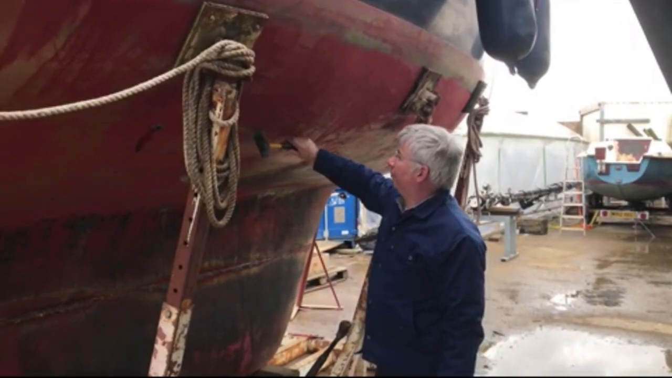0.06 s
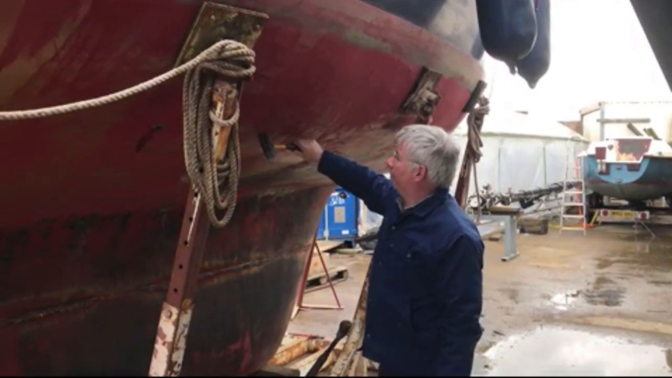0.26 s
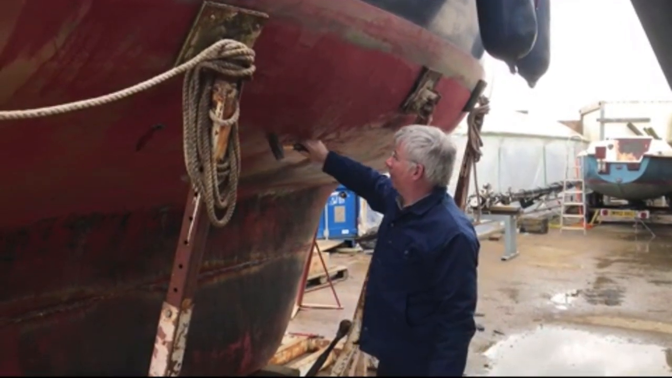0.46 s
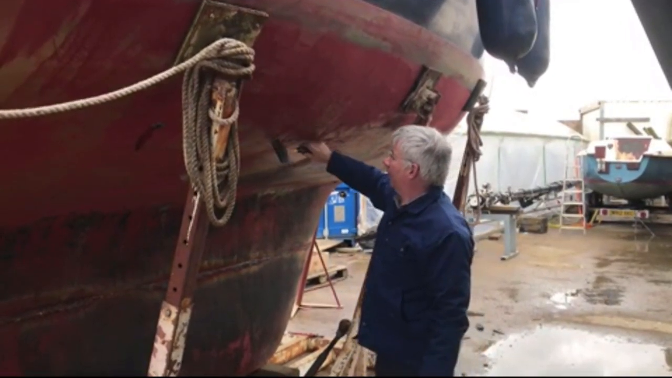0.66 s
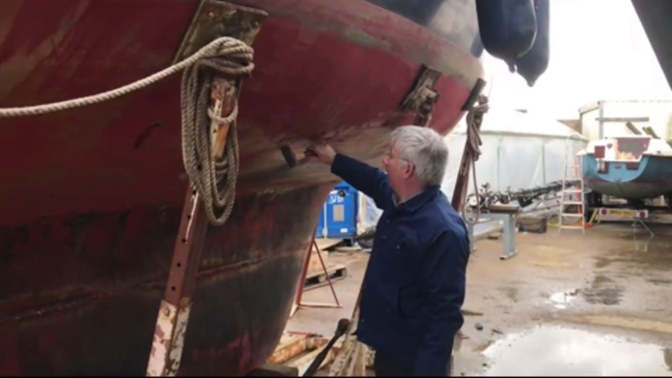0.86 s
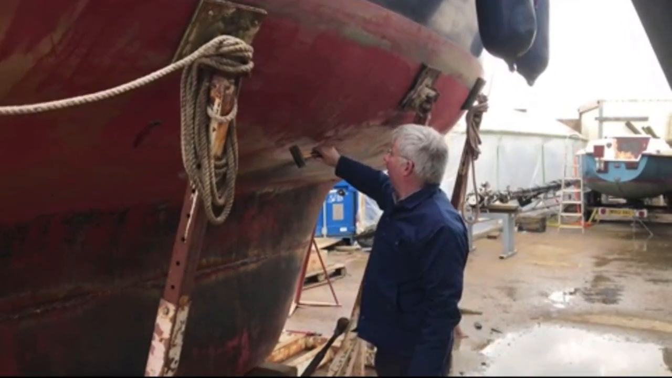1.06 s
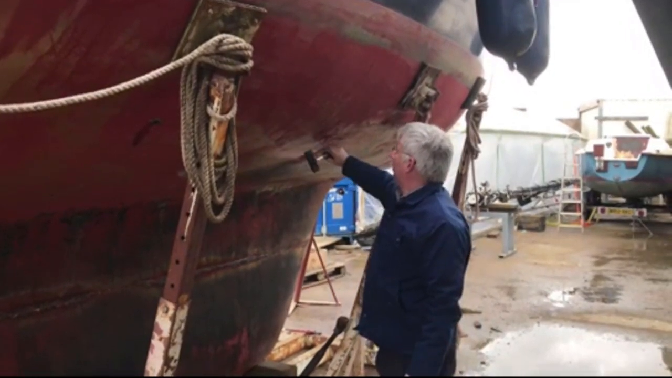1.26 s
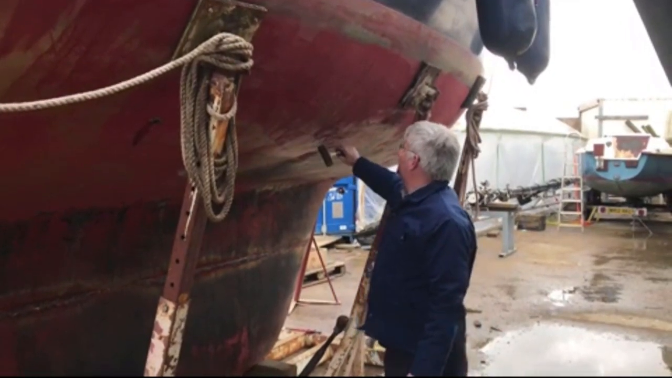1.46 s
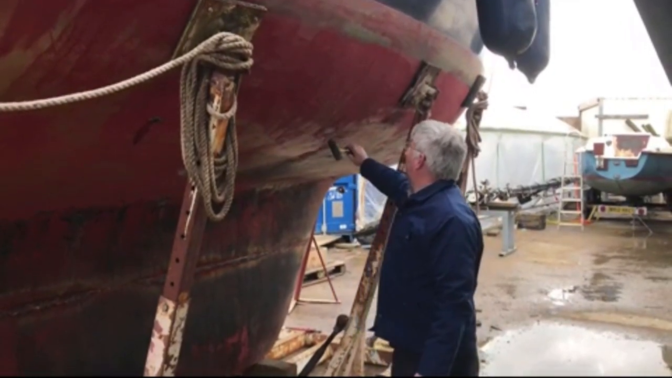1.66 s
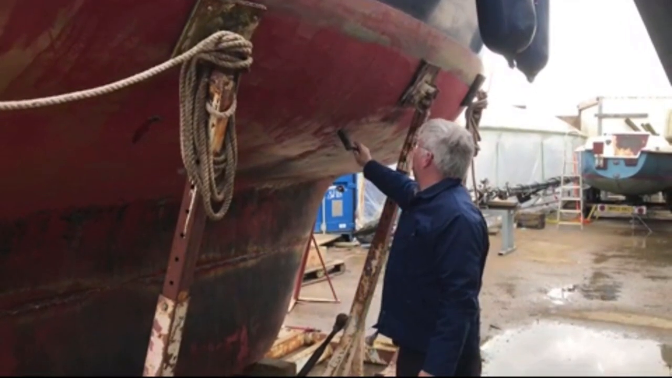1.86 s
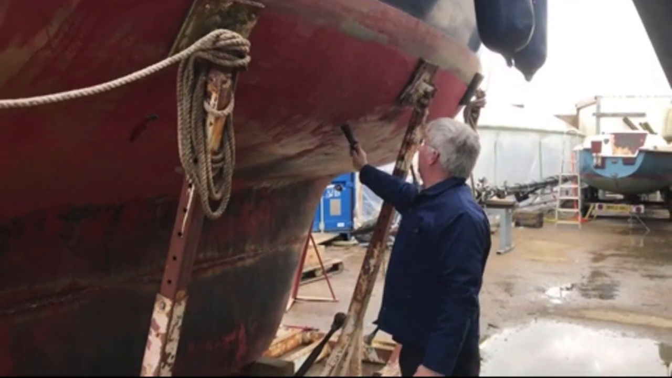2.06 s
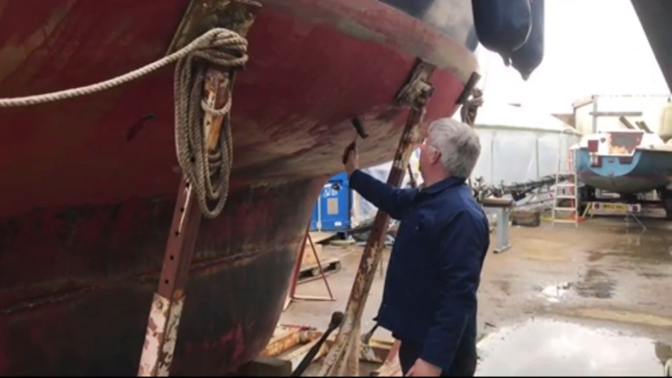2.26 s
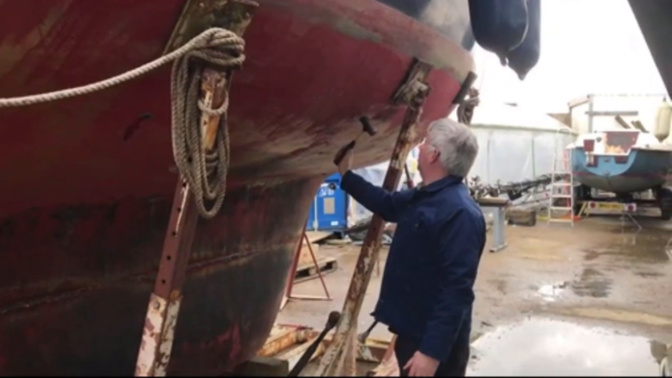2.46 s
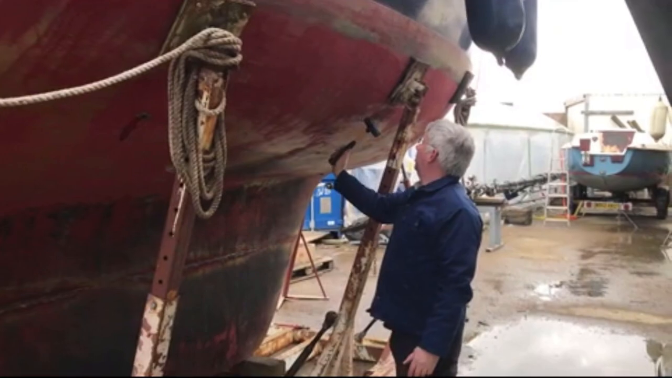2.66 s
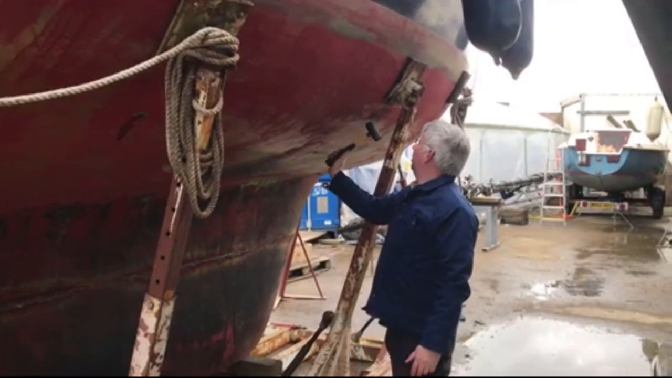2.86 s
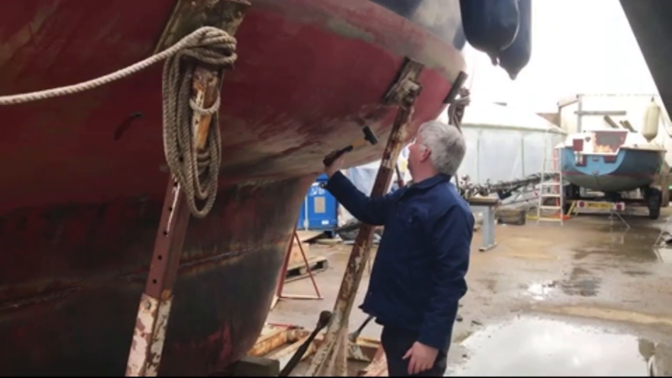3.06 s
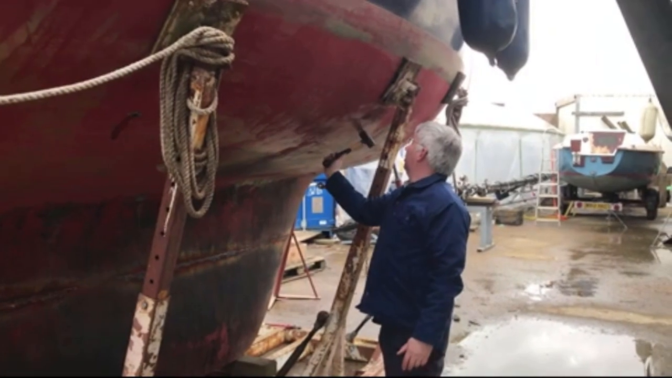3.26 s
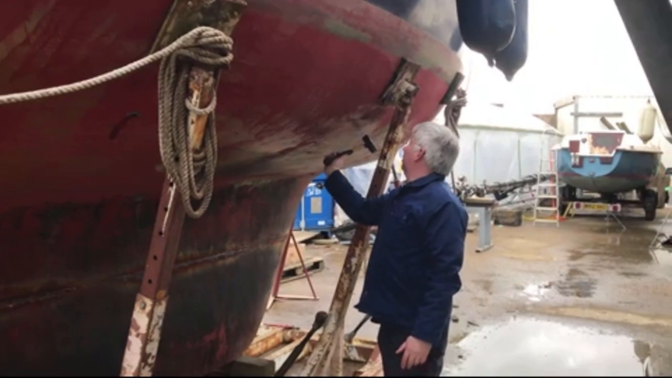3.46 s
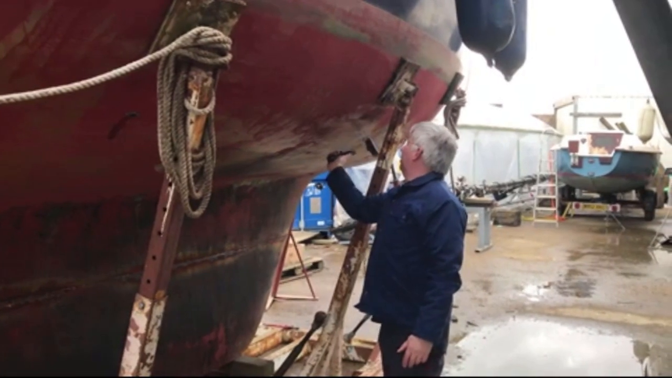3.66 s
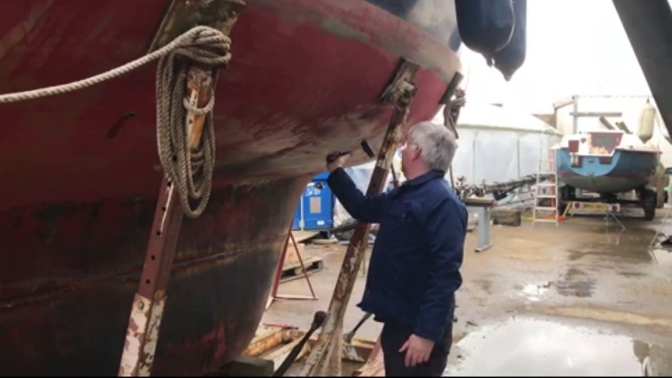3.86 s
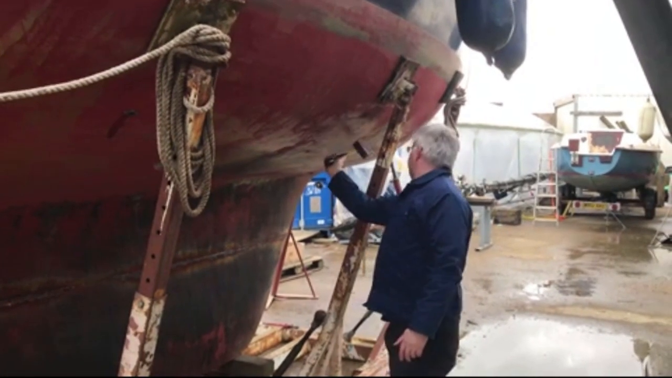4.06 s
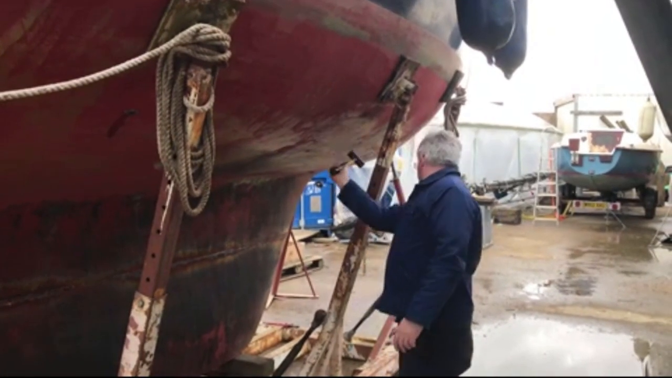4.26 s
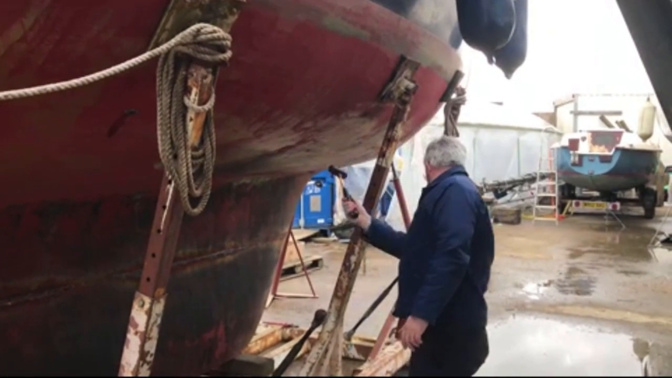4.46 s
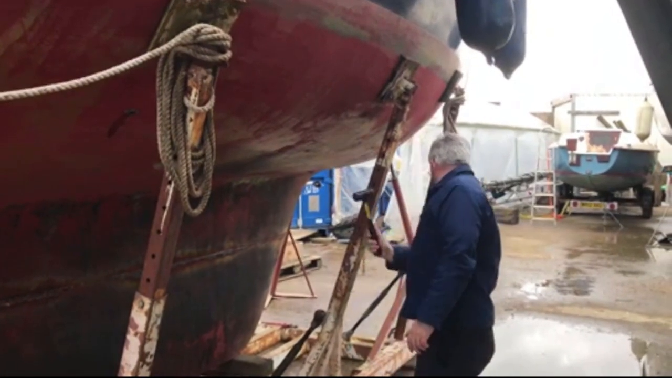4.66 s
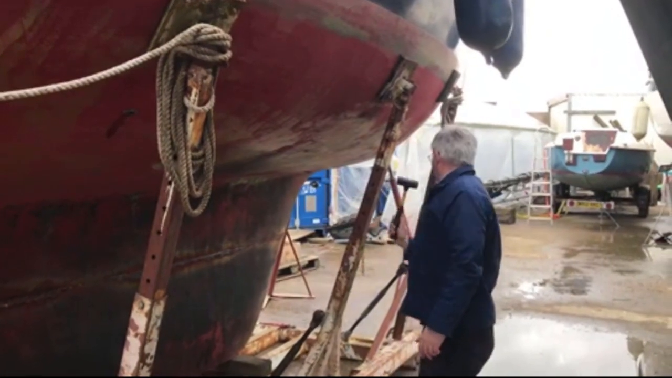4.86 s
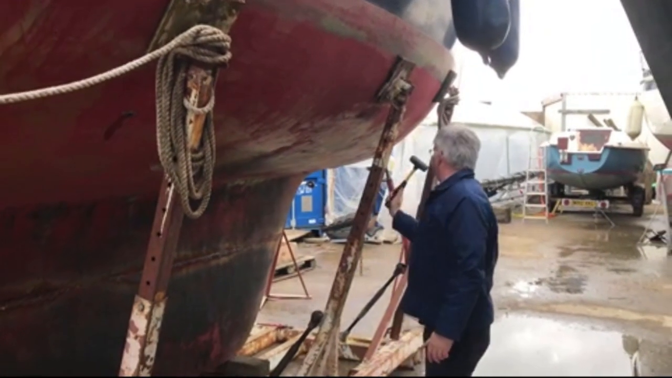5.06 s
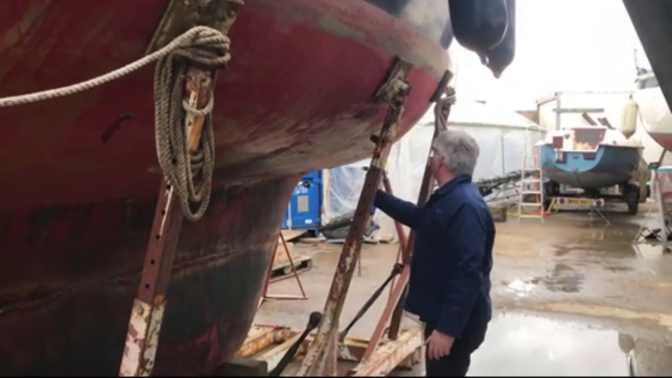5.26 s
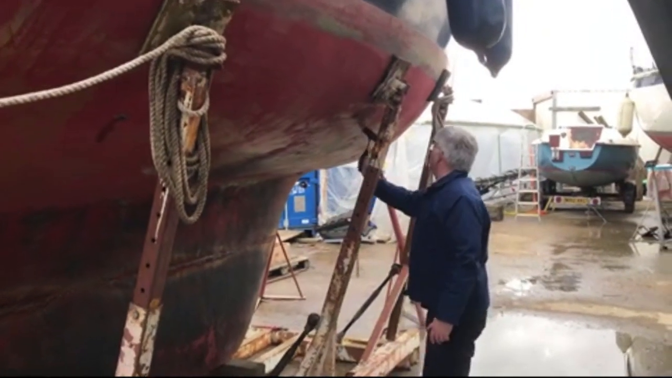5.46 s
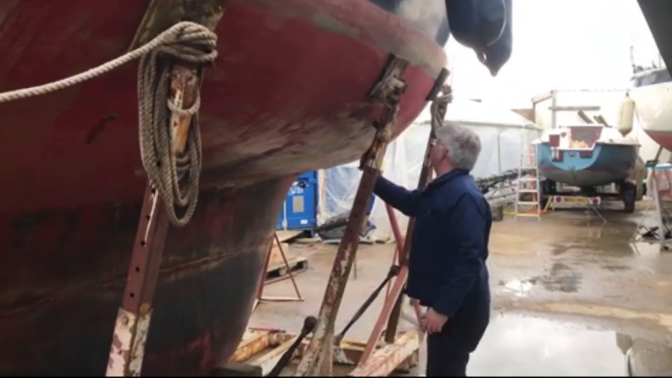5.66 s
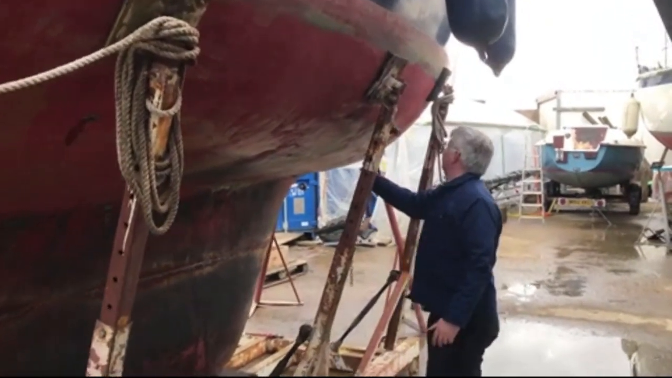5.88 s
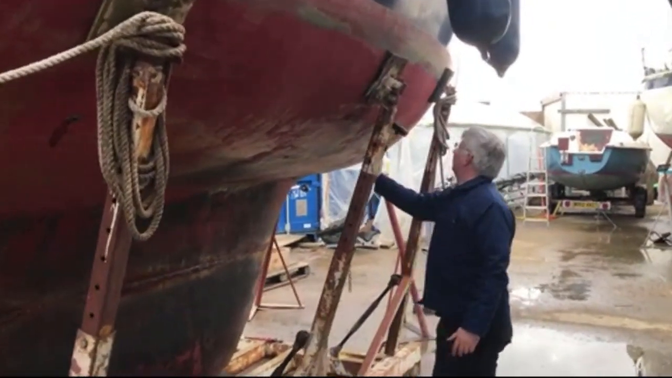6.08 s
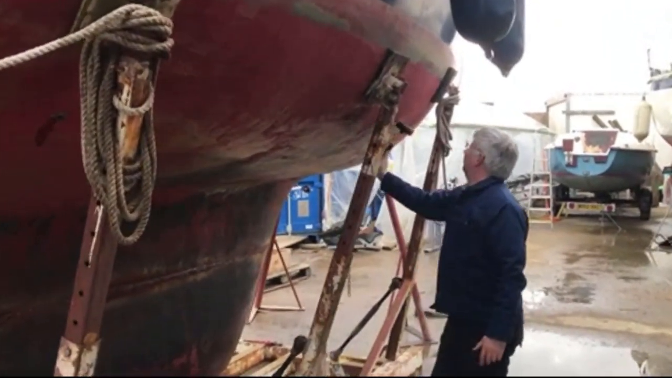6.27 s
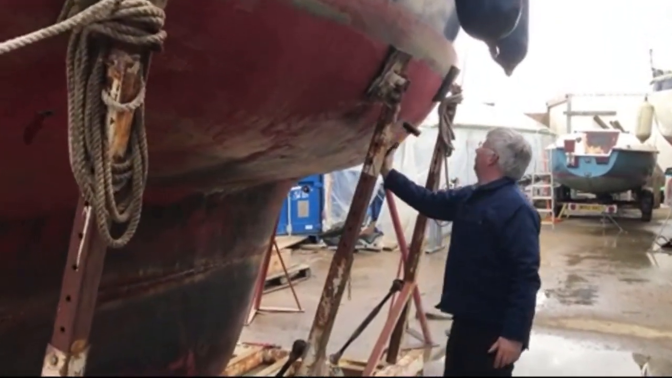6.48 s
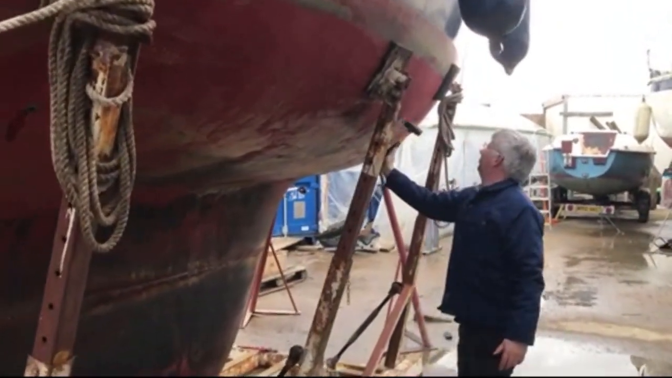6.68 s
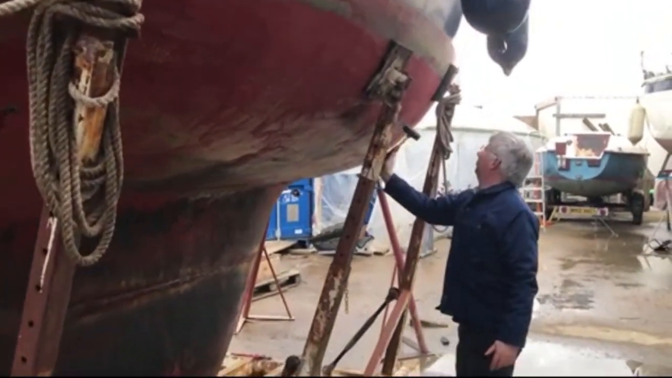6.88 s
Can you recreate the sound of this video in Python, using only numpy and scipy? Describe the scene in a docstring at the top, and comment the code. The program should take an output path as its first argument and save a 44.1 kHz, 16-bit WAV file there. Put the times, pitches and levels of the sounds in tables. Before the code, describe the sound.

In an open boatyard, a small hammer raps a fibreglass hull at a steady four to five blows a second. Each tap has a crisp crack and a short hollow, woody body, with quick echoes. After about four seconds it stops; faint scrapes and a soft knock cross the pause. Then eight duller taps follow, weakening at the end. A single microphone a few metres away also catches low rumble and hiss.

```python
"""Sharp, hollow taps of a small hammer on a glass-fibre boat hull, heard a few metres off in an open yard.
Each blow sends dispersive bending waves through the skin, excites the panel modes and the air space,
and echoes off nearby and far surfaces. Small scrapes, far knocks and thin rings are filtered noise puffs.
Behind lie a far rumble, hiss and a machine hum, all noise; automatic gain ducks the yard after a blow."""
import sys
import numpy as np
from scipy import signal
from scipy.fft import rfft, irfft, next_fast_len
from scipy.io import wavfile
from scipy.ndimage import map_coordinates

SR = 44100
rng = np.random.default_rng(int(sys.argv[2]) if len(sys.argv) > 2 else 0)


def log_audio(samples):
    """Write samples as a 16-bit WAV file to the path given in sys.argv[1]."""
    # one column per channel
    frames = np.atleast_2d(samples).T
    # limit to full scale, then quantise
    limited = np.clip(frames, -1, 1)
    pcm = np.round(limited * 32767).astype(np.int16)
    wavfile.write(sys.argv[1], SR, pcm)


N = 305172  # samples in the scene

# Hammer blows: [t/s, panel level/dB, skin level/dB, contact hardness/dB, spot note f/Hz, spot note level/dB]
BLOWS = [(0.086, -18, -12.5, -2, 784, -12.5), (0.3103, -18.5, -10, 1.5, 734, -11.5),
         (0.5383, -15.5, -11.5, 1.5, 740, -17), (0.7607, -17.5, -12.5, 2, 789, -31),
         (0.9796, -18, -13, -3, 720, -17), (1.1816, -16, -13, 3, 713, -14.5),
         (1.4189, -15.5, -11.5, 1.5, 722, -27), (1.6436, -16.5, -12.5, -1.5, 746, -31),
         (1.8739, -20, -13.5, -2.5, 746, -11), (2.0866, -16.5, -13, -1, 703, -10),
         (2.3072, -19.5, -17.5, 1.5, 702, -37), (2.507, -19.5, -14.5, 4, 770, -23),
         (2.6964, -20.5, -13, 1.5, 688, -8), (2.8988, -24.5, -19, 8.5, 686, -11),
         (3.0858, -19.5, -12.5, 0.5, 762, -15), (3.263, -20, -14, 3.5, 863, -9),
         (3.458, -21.5, -19, 1, 880, -21), (3.6427, -18.5, -14, 2, 991, -30),
         (3.85, -18.5, -14, -0.5, 758, -12), (4.0342, -19, -15.5, -1, 760, -33),
         (4.2071, -19.5, -16.5, -2, 730, -29), (5.5034, -16, -19.5, -4.5, 735, -28),
         (5.7069, -16, -19.5, -6, 747, -19), (5.9054, -15, -18, 2.5, 745, -11.5),
         (6.0951, -17.5, -20, -3.5, 696, -34), (6.2883, -18, -19, -4, 1065, -16),
         (6.4798, -23, -20.5, -4, 757.5, -22), (6.6702, -26, -24, 0.5, 1041, -15),
         (6.8636, -25, -16.5, -9, 892, -17)]
# Hammer's place among the frames, interpolated in time: [t/s, narrow over wide panel level/dB,
# middle panel over their mean level/dB, air-space boom over panel level/dB,
# crack over skin level/dB at hardness 0, middle crack f/Hz]
HAMMER_PLACE = [(0, -8.5, 3, -18, 3.5, 2820), (.55, -6.5, 4.5, -16.5, 6.5, 3010),
                (.9, -2.5, 3.5, -9.5, 8, 2890), (1.3, 0.5, -9.5, -10.5, 9, 3440),
                (1.85, -7.5, 3.5, -16, 7, 3130), (2.401, 7, 7, -19, 8.5, 2900), (2.9, 13, 1, -16, 6, 3010),
                (3.3, 5.5, 1, -16, 7, 3064), (4.2, 8, .6, -11.5, 5, 2750), (5.5, 4, 2, -20, 6, 3117),
                (5.95, 2, -6, -26, 8.5, 2995), (6.9, 18.5, 4.5, -4.5, 7, 2890)]
# Middle pitch of the wide, middle and narrow panels between frames: [f/Hz]
PANELS_HZ = [249, 360, 520]
# Low modes of the hull: [f/Hz, relative level/dB, t60/s]
HULL_MODES = [(210.2, 2.5, 0.15), (240, 1.5, 0.14), (272.6, 6.5, 0.14), (328.8, 3, 0.079),
              (382, 7.5, 0.069), (429, 7, 0.057), (476, 4, 0.051), (510, 8.5, 0.048), (571, -5, 0.089),
              (616, -8, 0.078), (698, -6.5, 0.12), (824.6, -3, 0.045), (985.8, -7, 0.12)]
# Resonances of the hull's air space: [f/Hz, t60/s]
AIR_SPACE = [(125, 0.26), (150, 0.19)]
# Colour of the skin's dense upper modes: [f/Hz, relative level/dB]
SKIN_COLOUR = [(250, -79), (500, -2.5), (750, 1), (1300, -1.5), (2200, -7), (3400, -15.5), (4200, -23),
               (5000, -29.5), (7000, -54.5)]
# Colour of the steel face's tick: [f/Hz, relative level/dB]
FACE_COLOUR = [(4000, -45), (5300, -0.5), (6500, 1.5), (7600, -7), (9000, -11.5), (10500, -18),
               (12000, -15.5), (16000, -20)]
# Decay of the skin's crowded modes: [f/Hz, t60/s]
SKIN_DECAY = [(300, 0.2), (1000, 0.09), (3000, 0.11), (7000, 0.13), (14000, 0.088)]
# Decay of the yard's reverberation: [f/Hz, t60/s]
YARD_DECAY = [(200, 0.56), (700, 0.45), (2000, 0.38), (6000, 0.46), (14000, 0.47)]
# Echoes from ground, keel and next hull: [mean delay t/s, relative level/dB]
NEAR_ECHOES = [(.0045, -4.5), (.0085, -2), (0.016, -5.5)]
# Far surfaces that return the bass: [delay t/s, level over the direct panel sound/dB]
FAR_WALLS = [(0.021, -13), (0.05, -20), (0.081, -31.5)]
# Scrapes on paint, far knocks, faint narrow puffs of high noise and rings:
# [t/s, level/dB, f/Hz, bandwidth/Hz, length/s]
SMALL_SOUNDS = [(1.33, -54, 9000, 12000, 0.02), (1.352, -52, 5970, 12000, 0.033),
                (2.003, -47, 11000, 8000, 0.0025), (2.266, -51.5, 2940, 5860, 0.085),
                (4.163, -54, 9000, 10000, 0.017), (4.284, -57, 6300, 2480, .006),
                (4.564, -49, 1480, 1800, 0.027), (4.643, -67, 7700, 300, 0.04),
                (5.215, -64, 9750, 500, .02), (5.235, -50.5, 1276, 1200, 0.036),
                (5.368, -61, 9000, 10000, 0.031), (5.562, -52, 8900, 12000, 0.072),
                (5.835, -59, 9000, 10000, 0.016), (5.91, -52, 2710, 60, 0.12), (6.093, -55, 2560, 60, 0.1),
                (6.237, -62, 8960, 12000, 0.049)]
# Colour of the far rumble: [f/Hz, relative level/dB]
RUMBLE_COLOUR = [(18, -45), (30, -5), (54, -3), (96, -10), (167, -8), (177, -5.5), (184, -37), (200, -2.5),
                 (220, -16), (238, -9), (300, -42), (390, -57), (660, -120)]
# Colour of the yard's hiss: [f/Hz, relative level/dB]
HISS_COLOUR = [(200, -28), (300, 5.5), (700, 0), (1100, 0), (2500, -5.5), (4200, -8), (4900, -12),
               (6500, -13), (8000, -20), (9800, -18), (10600, -28), (12000, -19.5), (15800, -31)]
# Course of the yard's hiss: [t/s, level/dB]
HISS_LEVEL = [(0, -59), (1, -57), (2, -60), (3.2, -61.5), (4.199, -52.5), (4.6, -53), (5.4, -53.5),
              (6.92, -53)]
# Far machine's hum: [half-width where its spectrum falls to 1/e/Hz, level/dB]
MACHINE_HUM = (13.5, -62.5)

LIFE, LEAD = 16000, 220  # samples: length of one blow, room before its pulse
MODES_DB, DRONE_DB = 1, -6.5  # hull modes over the panel levels, weak modes over the loudest panel
FACE_DB = -24  # steel face over the skin at hardness 0
CRACK_SPREAD = 0.038  # relative scatter of the crack's pitch from blow to blow
CRACK_GROWS = .4  # dB the crack gains for each dB of hardness
EVEN_DB = 6.5  # crack level at which the skin's treble is neither lifted nor dulled
RUMBLE_DB, HUM_HZ = -43, 487
TOP_HZ = 15900  # upper band limit


def hammer():
    """Superposition: overlapping blows add, with the tail of an earlier one dying at the start."""
    out = np.zeros(N + 2 * LIFE)
    when, *columns = np.transpose(HAMMER_PLACE)
    earlier = (-.13, *BLOWS[0][1:])
    for s, panel_db, *how in [earlier, *BLOWS]:
        narrow_db, middle_db, boom_db, crack_db, crack_hz = (np.interp(s, when, c) for c in columns)
        panels_db = panel_db + np.array([-narrow_db / 2, middle_db, narrow_db / 2])
        one = blow(panels_db, panel_db + boom_db, crack_db, crack_hz, *how)
        out[LIFE + round(s * SR) - LEAD:][:LIFE] += one
    return out[LIFE:][:N]


def blow(panels_db, boom_db, crack_db, crack_hz, skin_db, hard_db, spot_hz, spot_db):
    """Impact excitation: one contact drives panels, air space, skin and steel face together."""
    t = np.maximum(np.arange(LIFE) - LEAD, 0) / SR

    def struck(hz):  # each mode follows the panels near its pitch
        return along(list(zip(PANELS_HZ, panels_db)), hz)

    panel = panel_modes(t, struck)
    boom = amp(boom_db) * air_boom(t)
    crack_db = crack_db + CRACK_GROWS * hard_db
    crack_hz = crack_hz * rng.normal(1, CRACK_SPREAD)
    face_seen = rng.uniform(.3, 1)  # share of the steel face in plain view
    drone = amp(panels_db.max() + DRONE_DB) * weak_modes(struck)
    spot = amp(spot_db) * ring(t, spot_hz, .06) * (1 - np.exp(-(t / .002) ** 2))
    skin = amp(skin_db) * skin_waves(crack_db)
    # brief ring of the contact
    crack = amp(skin_db + crack_db) * ring(t, crack_hz, .0075) * (1 - np.exp(-t / .0008))
    face = amp(skin_db + FACE_DB + hard_db) * steel_face(face_seen)
    return panel + boom + drone + spot + crack + np.roll(skin, 40) + np.roll(face, 60)


def panel_modes(t, struck):
    """Modal superposition: damped sines of the low hull modes, with bass returned by far surfaces."""
    hz, db, t60 = np.transpose(HULL_MODES)[..., None]
    # neighbouring modes start roughly opposed
    phase = np.pi * np.arange(len(hz))[:, None] + rng.normal(0, 0.92, hz.shape)
    # a mode needs a couple of cycles to spread over its panel
    swell = 1 - np.exp(-(t * hz / 1.67) ** 3)
    level = db + struck(hz) + rng.normal(0, 1.7, hz.shape) - 60 * t / t60
    modes = amp(level) * np.sin(2 * np.pi * hz * t + phase) * swell
    panel = amp(MODES_DB) * modes.sum(0)
    return panel + sum(amp(db) * np.roll(panel, int(delay * SR)) for delay, db in FAR_WALLS)


def air_boom(t):
    """Cavity resonance: the enclosed air rings in damped sines after a quick onset."""
    return sum(ring(t, hz, t60) for hz, t60 in AIR_SPACE) * (1 - np.exp(-t / 0.00042))


def weak_modes(struck):
    """Modal overlap: crowded weak low modes merge into coloured noise that follows the panels."""
    wash = [(120, -14), (200, 4), (550, 1.0), (900, -8.5), (2000, -59)]  # f/Hz, level/dB
    return burst(lambda hz: struck(hz) + along(wash, hz),
                 direct=1.2, seen=0.33, echo_db=-4, bend_s=0.002416, yard_db=-4)


def skin_waves(crack_db):
    """Bending-wave dispersion: the skin's dense modes, brighter when the crack is stronger."""
    def colour(hz):
        octave = np.clip(np.log2((hz + 1) / 1500), 0, 1)  # tilt over 1500-3000 Hz, then level
        return along(SKIN_COLOUR, hz) + (crack_db - EVEN_DB) * octave
    return burst(colour, direct=13.3, seen=0.74, echo_db=-8.5, bend_s=0.002556, yard_db=-13.0)


def steel_face(seen):
    """Direct radiation: the steel face's high tick reaches the ear without bending-wave delay."""
    return burst(lambda hz: along(FACE_COLOUR, hz),
                 direct=13.3, seen=seen, echo_db=0.0, bend_s=0, yard_db=-16)


def burst(colour, direct, seen, echo_db, bend_s, yard_db):
    """Impulse response: a pulse with echoes, fast dying modes and the yard's slower answer, in one colour."""
    t = np.arange(LIFE) / SR
    crowd = dying(SKIN_DECAY) * (1 - np.exp(-t / 0.00096))
    crowd += amp(yard_db) * dying(YARD_DECAY) * (1 - np.exp(-t / 0.0024))
    crowd[0] += direct * seen
    for delay, db in NEAR_ECHOES:
        crowd[int(delay * rng.normal(1, .03) * SR)] += direct * amp(db + echo_db)

    def response(hz):
        # bending-wave speed grows as the root of frequency: treble arrives first;
        # group delay is bend_s * (sqrt(1000 / hz) - 1/2)
        bend = np.exp(-2j * np.pi * bend_s * (2 * np.sqrt(hz * 1000) - hz / 2))
        return amp(colour(hz)) * bend

    mean_gain = np.sqrt(np.mean(amp(colour(np.linspace(0, SR / 2, 999))) ** 2))
    return filtered(np.roll(crowd, LEAD), response) / mean_gain


def dying(t60s):
    """Frequency-dependent damping: noise starts at rms 1 and each frequency dies at its own speed."""
    hz, t, z = signal.stft(rng.standard_normal(LIFE), SR, nperseg=128)
    decay = amp(-60 * t / along(t60s, hz)[:, None])
    return signal.istft(z * decay, SR, nperseg=128)[1][:LIFE]


def ring(t, hz, t60):
    """Exponential damping: a sine that falls 60 dB in t60 seconds."""
    return amp(-60 * t / t60) * np.sin(2 * np.pi * hz * t)


def ticks():
    """Resonant filtering: each short noise puff passes one resonance twice."""
    out, t = np.zeros(N + SR), np.arange(12000) / SR
    for s, db, hz, width, length in SMALL_SOUNDS:
        puff = rng.standard_normal(len(t)) * np.exp(-(t / max(length, .001)) ** 2)

        def resonance(f):
            once = 1j * f * width / (hz * hz - f * f + 1j * f * width)
            return once ** 2 * np.sqrt(SR / 2 / width)  # offsets the loss of a narrow band

        out[round(s * SR):][:len(t)] += amp(db) * filtered(puff, resonance)
    return out[:N]


def yard_noise():
    """Spectral shaping of noise: a lumpy far rumble, smooth hiss and a narrow, wavering machine hum."""
    def noise(response):
        return unit(filtered(rng.standard_normal(N), response))

    rumble_level = amp(RUMBLE_DB + 0.36 * wobble(6.1))
    rumble = rumble_level * noise(lambda hz: amp(along(RUMBLE_COLOUR, hz)))
    hiss_level = amp(np.interp(np.arange(N) / SR, *np.transpose(HISS_LEVEL)))
    hiss = hiss_level * noise(lambda hz: amp(along(HISS_COLOUR, hz)))
    width, hum_db = MACHINE_HUM
    hum = amp(hum_db) * noise(lambda hz: np.exp(-((hz - HUM_HZ) / width) ** 2))
    return rumble + hiss + hum


def wobble(rate):
    """Random modulation: a smooth curve through random knots, rate knots a second."""
    return map_coordinates(rng.standard_normal(int(N * rate / SR) + 4), [np.arange(N) * rate / SR])


def amp(db):
    """Decibel law: amplitude gain of a level in dB."""
    return 10 ** (np.asarray(db) / 20)


def unit(x):
    """Normalisation: x at rms 1."""
    return x / np.sqrt(np.mean(x ** 2) + 1e-20)


def along(points, hz):
    """Logarithmic interpolation: (f/Hz, value) points read on a log frequency axis."""
    f, v = np.transpose(points)
    return np.interp(np.log(hz + 1), np.log(f + 1), v)


def filtered(x, response):
    """Linear filtering: the spectrum of x times a complex response of frequency."""
    m = next_fast_len(len(x) + 8192)
    return irfft(rfft(x, m) * response(np.fft.rfftfreq(m, 1 / SR)), m)[:len(x)]


def scene():
    """Superposition at one microphone: hammer, small sounds and yard."""
    return (hammer() + ticks() + yard_noise())[None]


def record(dry):
    """Automatic gain control: gain drops with loud sound and creeps back, then peaks and band are limited."""
    fade = np.exp(-1 / (.2 * SR))  # 0.2 s averaging of power
    loud = signal.lfilter([1 - fade], [1, -fade], dry[0] ** 2)
    ducked = dry[0] / (1 + loud / amp(-53.5)) ** 0.1  # knee in mean square: an rms level of -26.75 dB
    soft = ducked / (1 + np.abs(ducked / .82) ** 5) ** (1 / 5)  # the input stage rounds the tallest peaks
    # bass rolls off below about 40 Hz; nothing passes from TOP_HZ upward
    return filtered(soft, lambda hz: (hz < TOP_HZ) / (1 + (40 / (hz + 1)) ** 4))[None]


dry = scene()
out = record(dry)
log_audio(out)
```